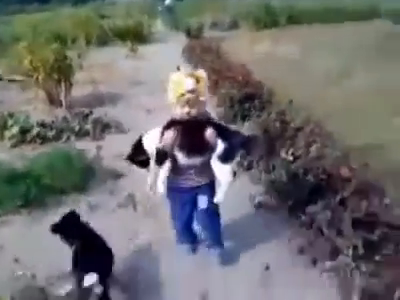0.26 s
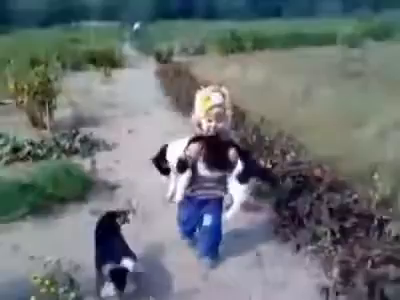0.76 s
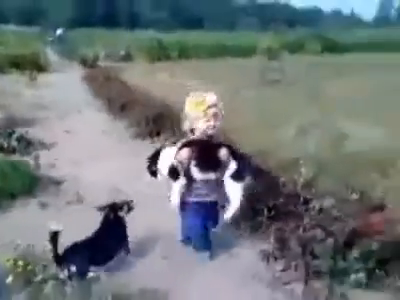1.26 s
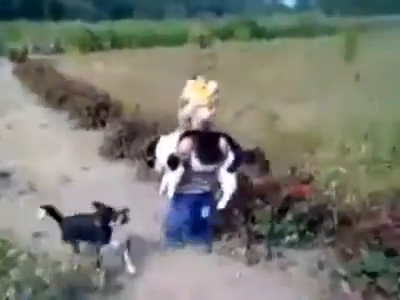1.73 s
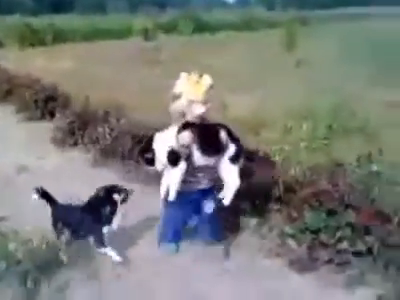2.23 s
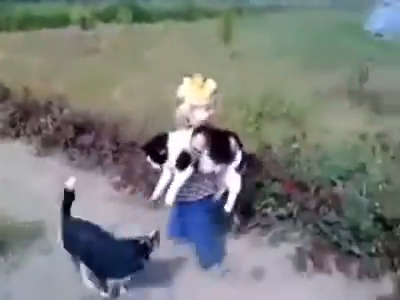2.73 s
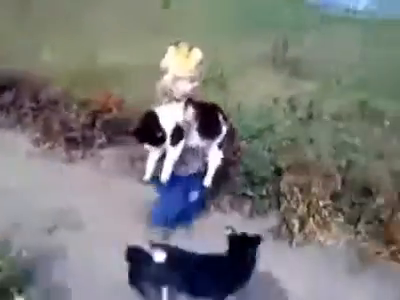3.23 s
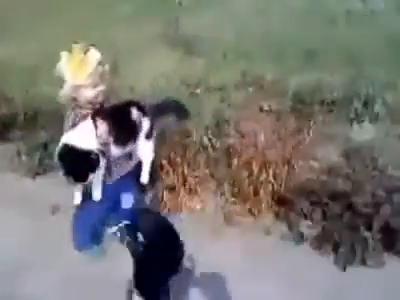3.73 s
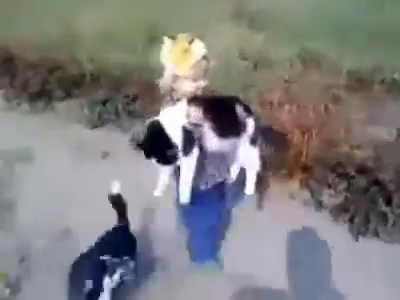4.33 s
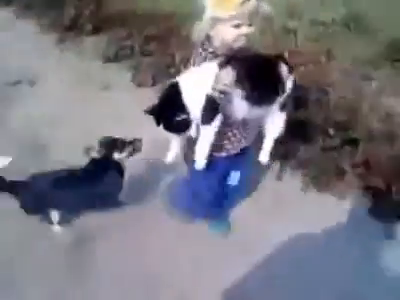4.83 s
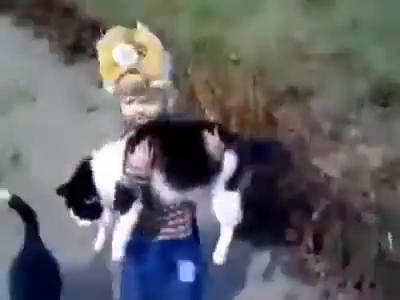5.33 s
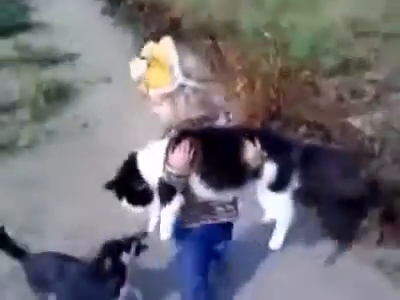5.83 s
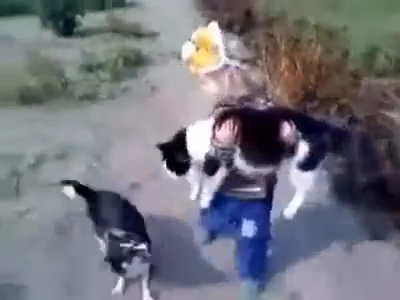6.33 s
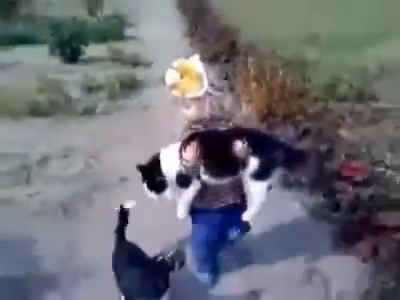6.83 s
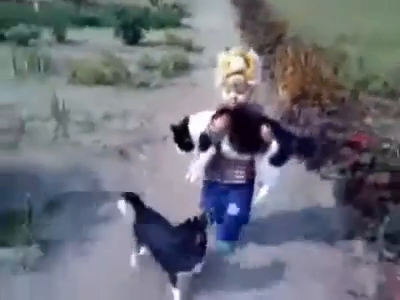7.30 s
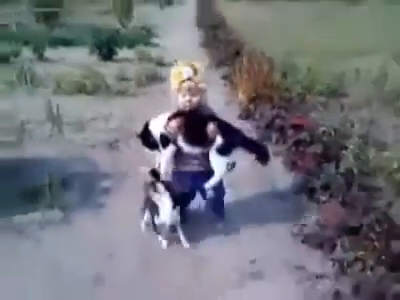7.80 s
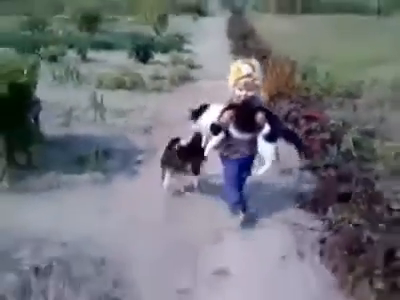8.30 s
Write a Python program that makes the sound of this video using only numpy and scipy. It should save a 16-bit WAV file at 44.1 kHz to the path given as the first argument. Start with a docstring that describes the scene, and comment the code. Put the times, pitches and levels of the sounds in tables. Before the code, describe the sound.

A small dog worries and snarls on a sandy garden path: a short growl, a brief gap, then long gravelly growls with moving jaw tones, clipped grunts and hard tooth-like snaps. A single bark bursts out after five seconds, then growling resumes and breaks into small snarls. Thudding gusts, soft sand scuffs and faint open-air hiss surround it, captured close by a modest handheld microphone.

```python
"""Sandy garden path: a small dog growls and snarls at a cat, with one sharp bark.
Its vocal folds flap unevenly into a throat whose resonances slide as the jaw and lips move.
Wind buffets the small microphone as lumpy low noise with single gusts; a faint wash lies under it.
Sharp snaps, of teeth or hard growl pulses and onsets, are noise cracks with a short hollow ring.
Swells of grainy noise make the foot scuffs on sand and brief bright ticks within the growls."""
import sys
import numpy as np
from scipy import signal
from scipy.fft import rfft, irfft, next_fast_len
from scipy.io import wavfile
from scipy.ndimage import uniform_filter1d

SR = 44100
rng = np.random.default_rng(int(sys.argv[2]) if len(sys.argv) > 2 else 0)


def inscribe(sig):
    """Save sig as 16-bit PCM at rate SR to the path in sys.argv[1].

    A 1-D sig is mono; a 2-D sig holds one channel per row.
    Samples are clipped to [-1, 1] before scaling.
    """
    pcm = np.round(np.clip(np.atleast_2d(sig).T, -1, 1) * 32767)
    wavfile.write(sys.argv[1], SR, pcm.astype(np.int16))


N = 377496
T = np.arange(N) / SR


def amp(db):
    """Decibels to gain."""
    return 10 ** (np.asarray(db) / 20)


def evened(x):
    """Scales to rms 1."""
    return x / np.sqrt(np.mean(x ** 2) + 1e-20)


def steadied(x, size=900):
    """Holds the rms near 1 over spans of about size samples, keeping the faster flutter."""
    power = uniform_filter1d(uniform_filter1d(x ** 2, size), size)
    return x / np.sqrt(abs(power) + 1e-12)


def add(mix, start_s, sound):
    """Mixes a sound in at start_s."""
    part = mix[max(round(start_s * SR), 0):][:len(sound)]
    part += sound[:len(part)]


def coloured(x, points):
    """Filters x by (Hz, dB) points, joined on a log-frequency axis, to rms 1."""
    size = next_fast_len(len(x) + 2048)
    hz, db = np.transpose(points)
    bin_hz = np.fft.rfftfreq(size, 1 / SR) + 1  # + 1 avoids log(0)
    gain = amp(np.interp(np.log(bin_hz), np.log(hz), db))
    return evened(irfft(rfft(x, size) * gain, size)[:len(x)])


def noise(count, points):
    """White noise coloured by (Hz, dB) points."""
    return coloured(rng.standard_normal(count), points)


def wander(count, hz):
    """Random curve: a new normal value hz times a second, joined by straight lines."""
    return np.interp(np.arange(count) * hz / SR, np.arange(4096), rng.standard_normal(4096))


def resonate(x, hz, width_hz):
    """Double-pole resonance that follows the curve hz: shift to 0 Hz, low-pass, shift back; rms 1."""
    turn = np.exp(2j * np.pi * np.cumsum(hz * np.ones(len(x))) / SR)
    r = np.exp(-np.pi * width_hz / SR)
    envelope = signal.lfilter([1], [1, -2 * r, r * r], x / turn)
    return evened((turn * envelope).real)


def bounced(x, ground_s=0.002723, hop=0.16, ground_db=-3.5):
    """The ground returns an echo whose delay shifts as the dog hops about."""
    at = np.arange(len(x))
    delay_s = ground_s * np.exp(hop * wander(len(x), 7))
    return x + amp(ground_db) * np.interp(at - delay_s * SR, at, x, left=0)


def voice(effort_db, snarl_db, bite_db, first_hz, second_hz, third_hz, pitch_hz, chest_db, rough, third_db):
    """Uneven slaps of the folds, each with a puff of breath, ring the moving resonances of the throat."""
    # Breath noise and weak upper resonances of the mouth. Each row: frequency in Hz, level in dB.
    rasp_colour = [(150, -35.5), (300, -15), (500, -18), (800, 2.5), (2800, -1), (3600, -6.5), (4400, -21),
                   (5500, -18), (6900, -26), (8000, -43)]
    # Dip between chest and jaw resonances. Each row: frequency in Hz, gain in dB.
    throat_dip = [(150, -5), (380, -7.5), (600, 0.5), (850, 1), (1300, -3)]
    usual_effort_db, pitch_rise_per_db = -33, 0.015
    jitter, slip_turns, shimmer_db, judder_db = .2, .18, 4, 3  # all scaled by rough
    quiver_depth, quiver_hz = .045, 80
    puff_turns, leak = .22, .14
    low_puffs, high_puffs = .35, .66  # share of turbulence in the drive
    count, rough = len(effort_db), min(rough, 1)

    # pitch climbs a little with effort and snarl
    pitch_hz = pitch_hz * np.exp(pitch_rise_per_db * (effort_db + snarl_db - usual_effort_db))
    turns = np.cumsum(pitch_hz * np.exp(jitter * rough * wander(count, 90))) / SR
    # loose tissue above the folds slaps early or late, in some cycles much harder than in others
    flaps = np.maximum.accumulate(turns + slip_turns * rough * wander(count, 110))
    rattle = amp(shimmer_db * rough * wander(count, 129.44))
    slaps = evened(np.diff(np.floor(flaps), prepend=-1))
    opening = leak + np.exp(-(flaps % 1) / puff_turns)

    def drive(puff_share):
        """The shared slaps, with fresh turbulence in every puff."""
        puffs = evened(opening * rng.standard_normal(SR)[:count])
        return rattle * ((1 - puff_share) * slaps + puff_share * puffs)

    def ring(x, hz, width_hz):
        """One resonance, which quivers in pitch and judders in strength on its own."""
        quiver = np.exp(quiver_depth * rough * wander(count, quiver_hz))
        judder = amp(judder_db * rough * wander(count, 90.04))
        return steadied(resonate(x, hz * quiver, width_hz)) * judder

    low, high = bounced(drive(low_puffs)), bounced(drive(high_puffs))
    jaw = amp(0.94) * ring(coloured(low, throat_dip), first_hz, 280)
    lips = amp(-0.6) * (ring(high, second_hz, 520) + amp(third_db) * ring(high, third_hz, 390))
    # bared teeth add a harsh edge from two resonances above the third
    teeth = ring(drive(1), third_hz + 680, 600) + amp(-5.5) * ring(drive(1), third_hz + 1900, 700)
    edge = amp(bite_db - 4.0) * teeth
    rasp = steadied(coloured(drive(1), rasp_colour)) * amp(-9.0 + .5 * snarl_db)
    # the two lowest partials and a weak low resonance leave through the chest and neck
    hum = np.sin(2 * np.pi * flaps) + amp(-13) * np.sin(4 * np.pi * flaps)
    chest = steadied(rattle * hum) + amp(-11.5) * ring(low, 427, 110)
    return amp(effort_db) * (jaw + amp(snarl_db) * lips + edge + rasp + amp(chest_db) * chest)


def growl(course, tone):
    """A long growl, or the bark: effort, lips and jaw move while the voice keeps its character."""
    s, *columns = np.transpose(course)
    t = np.arange(s[0], s[-1], 1 / SR)
    controls = [np.interp(t, s, column) for column in columns]
    fade = signal.windows.tukey(len(t), min(1, 300 / len(t)))
    return s[0], voice(*controls, *tone) * fade


def buffet(centre_s, db, length_s, hz):
    """One gust swells and dies; the smaller its eddies, the higher it reaches."""
    # Gust spectrum for hz = 150, shifted in proportion. Each row: frequency in Hz, level in dB.
    gust_colour = [(30, -41), (80, -4), (150, -1.5), (270, -3), (420, -14), (700, -28.5), (1500, -62.5)]
    start_s = max(centre_s - .25, 0)
    t = start_s + T[:SR // 2]
    eddies = steadied(noise(len(t), [(f * hz / 150, level_db) for f, level_db in gust_colour]))
    return start_s, amp(db) * np.exp(-(2 * (t - centre_s) / length_s) ** 2) * eddies


def wind(lump_db=4):
    """Lumpy low eddies at the microphone, with single gusts on top."""
    # Breeze strength. Each row: time in seconds, level in dB.
    breeze = [(0, -36), (.28, -40), (.42, -53.5), (.76, -55), (.87, -33), (1.4, -33.5), (2.45, -28),
              (2.7, -42), (3.1, -35.5), (3.5, -28.5), (3.92, -37), (5, -29.5), (5.42, -29.5), (5.7, -53),
              (6.45, -36.5), (7.2, -52), (8.35, -49.5), (8.56, -32.5)]
    # Breeze spectrum. Each row: frequency in Hz, level in dB.
    breeze_colour = [(12, -43), (20, -15.5), (49, 0), (123, -2.5), (262, -12.5), (435, -29), (468, -20),
                     (700, -34.5), (910, -63.5), (1540, -120)]
    # Gusts. Each row: centre in seconds, level in dB, length in seconds, strongest frequency in Hz.
    gusts = [(0.068, -26.5, 0.031, 64.6), (0.275, -32, 0.018, 99), (1.125, -21, 0.053, 100),
             (1.218, -22.5, 0.023, 99), (1.76, -30, 0.19, 111), (1.996, -21.5, 0.11, 83),
             (2.17, -18.5, 0.091, 142), (2.303, -16.5, 0.023, 156), (2.512, -19.5, 0.028, 91),
             (2.88, -27.5, 0.23, 90), (3.319, -21.5, 0.11, 133), (3.48, -19, 0.03, 99),
             (3.765, -26.5, 0.12, 98), (4, -26, 0.044, 103), (4.16, -32.5, 0.039, 90),
             (4.466, -26, 0.011, 140), (4.58, -20, 0.055, 99), (4.688, -25.5, 0.17, 87),
             (4.896, -23.5, 0.053, 88), (5.08, -16.5, 0.021, 140), (6.151, -31, 0.049, 145),
             (6.427, -30, 0.076, 88), (7.387, -30.5, 0.22, 77)]
    eddies = steadied(noise(N, breeze_colour), size=2200)
    level_db = np.interp(T, *np.transpose(breeze)) + lump_db * wander(N, 40)
    rumble = eddies * amp(level_db)
    for row in gusts:
        add(rumble, *buffet(*row))
    return rumble


def air(level_db=-48.5, flutter_db=2):
    """Leaves and distant wind: a faint restless wash."""
    # Wash spectrum. Each row: frequency in Hz, level in dB.
    air_colour = [(60, -9.5), (150, -19), (320, -20.5), (1000, -21), (1450, -20), (2000, -21),
                  (2600, -18.5), (3400, -30), (6800, -33.5), (8000, -72.5)]
    return amp(level_db) * noise(N, air_colour) * amp(flutter_db * wander(N, 30))


def snarl(start_s, length_s, effort_db, snarl_db, first_hz, second_hz):
    """A short push of breath: quick attack, sagging hold as the jaw closes, dying release."""
    rise_s, fall_s = 0.011, 0.017
    sag_db, closing = 3, 0.11  # total change from start to end of the hold
    pitch_hz, chest_db, rough, third_db = 139.3, -5.5, .8, -4  # third_db relative to the second resonance
    bite_db = snarl_db - 16.5
    third_hz = second_hz + 637
    t = np.arange(0, length_s + 5 * fall_s, 1 / SR)
    early = .5 - np.minimum(t / length_s, 1)
    gate = np.minimum(t / rise_s, 1) * np.exp(-np.maximum(t - length_s, 0) / fall_s)
    mouth = 1 + closing * early
    sound = voice(effort_db + sag_db * early, snarl_db, bite_db,
                  first_hz * mouth, second_hz * mouth ** .5, third_hz * mouth ** .5,
                  pitch_hz, chest_db, rough, third_db)
    return start_s, gate * sound


def snap(start_s, db, ring_hz, tail_db, crack_s=0.0016, tail_s=0.035):
    """A sharp snap: a dry noise crack with a short hollow ring and a scattered tail."""
    # Crack spectrum. Each row: frequency in Hz, level in dB.
    crack_colour = [(300, -11), (1100, -6.5), (1500, -9.5), (1800, -3.5), (2700, -2), (5500, -20),
                    (8000, -35)]
    t = T[:SR // 5]
    decay = np.exp(-t / crack_s) + amp(tail_db) * np.exp(-t / tail_s)
    burst = rng.standard_normal(len(t)) * decay
    sound = coloured(burst, crack_colour) + amp(-3.5) * resonate(burst, ring_hz, 350)
    return start_s, amp(db) * sound / np.std(sound[:220])  # level set over the first 5 ms


def swells(rows):
    """Level curve of smooth humps, summed in power; rows of (centre s, level dB, length s)."""
    power = 0
    for centre_s, db, length_s in rows:
        fall = 2 * (2 * (T - centre_s) / length_s) ** 2
        power = power + amp(db) ** 2 * np.exp(-np.minimum(fall, 60))
    return np.sqrt(power)


def scuffs_and_ticks(grain_db=4):
    """Swells of grainy noise: sand grinding under a foot, or brief bright ticks within the growls."""
    # Foot scuffs, and brief bright ticks within the growls.
    # Each row: centre in seconds, level in dB, length in seconds.
    grain_swells = [(1.87, -37, 0.084), (2.418, -30, 0.0085), (3.189, -31.5, 0.0085), (3.31, -32, 0.1),
                    (4.14, -47.5, 0.35), (5.28, -34, 0.08), (5.65, -30, 0.0079), (5.74, -40.5, 0.054),
                    (5.84, -46, 0.043), (6.98, -42.5, 0.19), (8.34, -40.5, 0.039)]
    # Grain spectrum. Each row: frequency in Hz, level in dB.
    grain_colour = [(300, -11), (800, -1.5), (1600, 1), (2600, 5), (3700, -1.5), (5000, -7), (6800, -9.5),
                    (8000, -47)]
    grains = rng.standard_normal(N) * amp(grain_db * wander(N, 400))
    return swells(grain_swells) * coloured(grains, grain_colour)


def garden(x, t60_s=0.24, wet_db=-16):
    """Bushes and legs scatter a weak tail: decaying noise taps after 4 ms."""
    t = T[:SR // 2]
    taps = rng.standard_normal(len(t)) * (t > .004) * amp(-60 * t / t60_s)
    return amp(wet_db) * signal.fftconvolve(x, taps / np.linalg.norm(taps))[:N]


def scene():
    """Close sounds and their scattered tail join wind and air at one microphone, alike in both channels."""
    # Courses of the long growls; the eighth is the bark. Each row: time in seconds, effort in dB,
    # snarl (second and third resonance over the first, before fixed trims) in dB,
    # bite (harsh edge over the first resonance, before fixed trims) in dB,
    # first, second and third resonance in Hz.
    courses = [
        [(0.0, -26, -9.5, -16, 1090, 2090, 2310), (0.065, -35.5, -4, -15, 750, 2000, 2260),
         (0.115, -28, -2, -11, 1060, 2250, 3000), (0.17, -26.5, -0.5, -16, 1320, 2250, 3100),
         (0.198, -25.5, -7, -21, 1160, 2150, 3150), (0.215, -33.5, 1.5, -12, 1170, 2200, 3020),
         (0.275, -52, 4, -8, 1310, 2550, 3350)],
        [(0.935, -46.5, 5, 2, 900, 1950, 2420), (0.97, -34.5, -2, -15, 700, 1950, 2300),
         (1.02, -24.5, -7.5, -18, 1110, 2150, 2700), (1.07, -29, -3.5, -25, 1200, 2500, 2760),
         (1.16, -29, -6.5, -25, 1195, 2560, 2840), (1.225, -44.5, 2.5, -9, 880, 1930, 2700),
         (1.255, -36, -2.5, -18, 990, 2090, 2850), (1.278, -25.5, -8, -32.5, 1080, 2160, 3000),
         (1.35, -28.5, -9.5, -32, 1126, 2080, 2550), (1.45, -33.5, -1.5, -12, 1080, 2150, 2530),
         (1.56, -28.5, -7.5, -22, 1176, 2150, 2500), (1.655, -29, -10.5, -35.5, 1320, 2160, 2580),
         (1.7, -23, -11, -32.5, 1210, 2400, 2700), (1.72, -41.5, 1.5, -16, 1090, 2420, 2640),
         (1.752, -51.5, 7, -12.5, 1060, 2400, 2640)],
        [(2.2, -53.5, -5, -9, 700, 1850, 2700), (2.25, -29.5, -4, -28, 970, 1960, 2780),
         (2.32, -35, -6.5, -19.5, 1256, 1940, 2950), (2.4, -30, 2.5, -23, 1100, 1970, 2700),
         (2.445, -40.5, 3.5, -13, 880, 1980, 2670), (2.5, -30.5, -5.5, -21.5, 1220, 1990, 3050),
         (2.535, -25, -12.5, -28, 1230, 2000, 2900), (2.56, -30, -5, -22, 1220, 2000, 3100),
         (2.57, -25.5, -4.5, -31, 1220, 1950, 3100), (2.63, -22.5, -3, -28, 1060, 1970, 2800),
         (2.665, -48, 5.5, 0, 860, 2040, 2600), (2.71, -46.5, 7, -3, 910, 2450, 3260),
         (2.76, -65, 9.5, -8, 950, 2350, 3350)],
        [(2.783, -36.5, 1, -13, 1650, 2300, 2900), (2.81, -29.5, -4, -11, 1510, 2200, 3000),
         (2.832, -35, 4, -4.5, 1000, 1980, 3020), (2.86, -43.5, 4, 2, 750, 1770, 2930),
         (2.895, -51, -3, -4, 750, 1560, 2720)],
        [(3.18, -58.5, 4, 11, 1300, 2200, 2700), (3.2, -32.5, 0, -13, 1320, 1880, 2650),
         (3.23, -21, -7.5, -12, 880, 1920, 2970), (3.26, -32, -8, -13, 696, 1950, 2880),
         (3.32, -35.5, 0.5, -8, 1060, 2030, 2940), (3.41, -36.5, 4, -21, 1040, 1730, 2800),
         (3.46, -31.5, -2.5, -29, 960, 1840, 2760), (3.57, -34.5, -1, -26, 970, 1950, 3090),
         (3.62, -45, -3.5, -13, 800, 1900, 2800), (3.69, -59.5, 15.5, 1.5, 760, 1760, 2800)],
        [(3.942, -53, 3, -16, 1450, 1750, 2400), (3.965, -42, -0.5, -20, 1300, 1770, 2200),
         (3.97, -30, -0.5, -33, 1160, 1800, 1990), (4.0, -34, -3, -27, 1040, 1900, 2290),
         (4.033, -28.5, -7, -12, 930, 2100, 2750), (4.055, -38.5, 3, -15, 834, 2140, 2800),
         (4.18, -36, 2.5, -7, 880, 2060, 2840), (4.24, -59, 1.5, -10, 810, 2000, 2700)],
        [(4.715, -55.5, 10.5, -8, 850, 2500, 2920), (4.742, -27.5, -0.5, -14, 710, 2280, 2930),
         (4.772, -22, -0.5, -8, 1290, 2110, 2850), (4.808, -26.5, -0.5, -17, 1230, 1900, 2590),
         (4.85, -35.5, 4, -15, 1180, 2520, 3000), (4.875, -43.5, 1.5, -7, 620, 2270, 2550),
         (4.915, -33.5, -4, -21, 820, 2000, 2710), (4.938, -26, -6, -20, 1170, 1550, 2820),
         (4.975, -28, -4.5, -22, 1230, 1600, 2840), (4.992, -30.5, -6, -17, 1020, 1690, 2740),
         (5.04, -31.5, -2, -15, 930, 1750, 2580), (5.11, -37, -3.5, -13, 950, 1980, 2770),
         (5.165, -54, 6, 4.5, 1040, 2210, 3000)],
        [(5.605, -54.5, 6.5, 5, 1450, 2400, 3200), (5.636, -48.5, 10, 7, 1450, 2400, 3200),
         (5.645, -36, 11, 11, 1450, 2480, 3240), (5.66, -23.5, 0.5, -9, 1240, 2130, 3050),
         (5.674, -20, -4.5, -18, 970, 1950, 2750), (5.71, -20.5, -1.5, -27, 930, 1950, 2970),
         (5.724, -28.5, -9, -10, 1320, 2090, 3350), (5.75, -38.5, 0.5, -6, 1370, 2200, 3450),
         (5.79, -53, 8, 0, 1350, 2100, 3500)],
        [(6.268, -53, 1, -7, 850, 2300, 2900), (6.288, -28.5, -7, -22, 870, 1900, 2370),
         (6.35, -42, 5.5, -19, 1010, 2280, 3100), (6.42, -33.5, -4.5, -32, 1260, 2050, 2600),
         (6.48, -39.5, 3, -10.5, 970, 2180, 2540), (6.56, -33.5, 1.5, -20, 1300, 1860, 2430),
         (6.63, -38.0, 7, -4, 860, 2360, 2690), (6.668, -26, -10.5, -18.5, 880, 2050, 2580),
         (6.71, -32.5, 5.5, -22.5, 1320, 2150, 2980), (6.77, -27.5, -4.5, -21, 1350, 2080, 2860),
         (6.86, -52.5, 1, -15, 1320, 2150, 2900)],
        [(7.232, -53.5, 12.5, -5, 950, 1700, 2580), (7.26, -32.5, 2, -40, 910, 1670, 2750),
         (7.305, -37.5, 8, -12, 900, 1720, 3300), (7.39, -40, -1.5, -27, 810, 1790, 2900),
         (7.55, -35.5, -6, -32, 930, 1850, 2830), (7.69, -30, -2, -18, 960, 1880, 2870),
         (7.755, -33, 6.5, -8, 880, 1920, 3140), (7.79, -34.5, 7.5, -10, 1120, 2660, 3240),
         (7.86, -40, 1.5, -13, 1510, 2750, 3500), (7.89, -57, 3, -11, 1550, 2700, 3500)],
    ]
    # Voice of each course, same order. Each row: pitch at usual effort in Hz, chest hum relative to
    # effort in dB, roughness 0-1, third resonance over the second in dB.
    tones = [(160.3, -5.5, .55, -4), (140.2, -17.5, .85, -5.5), (110.5, -25, 0.5, -2), (86, -13, 0.87, -6),
             (126.1, -3.5, .85, -4), (126.8, -0.5, 1, -4), (111.2, -18, 0.96, -3.5), (111.2, -29, .45, -5),
             (168.3, -5, 0.6, -3.5), (163.2, -2.5, .6, -2)]
    # Short snarls and grunts. Each row: start in seconds, length before release in seconds,
    # mid-hold effort in dB, snarl in dB, mid-hold first and second resonance in Hz.
    short_snarls = [(0.317, 0.056, -36, -1.5, 1200, 2300), (1.81, 0.098, -34.5, 2, 1205, 1840),
                    (1.919, 0.16, -42.5, 0, 1070, 1830), (2.789, 0.024, -35.5, 1.5, 1500, 2020),
                    (2.865, 0.024, -44.5, 2.5, 760, 1450), (2.925, 0.042, -40, 5.5, 1100, 1910),
                    (4.273, 0.048, -37, 4, 806, 1700), (4.377, 0.062, -44.5, 3.5, 880, 1580),
                    (5.224, 0.088, -34.5, 1.5, 1250, 1750), (5.332, 0.038, -26, 0, 1200, 1790),
                    (5.494, 0.05, -33, -1, 1210, 1990), (5.798, 0.012, -37.5, -1.5, 1570, 3550),
                    (5.83, 0.033, -44.5, -0.5, 1820, 3440), (5.941, 0.12, -51.5, 2.5, 980, 1650),
                    (6.878, 0.041, -34.5, 0.5, 870, 1340), (6.938, 0.071, -42.5, 5.5, 1107, 1670),
                    (7.901, 0.056, -43.5, 6.5, 890, 1500), (7.99, 0.074, -40, 1.5, 860, 1540),
                    (8.116, 0.036, -50, 9.5, 980, 1710), (8.286, 0.057, -36.5, 7.5, 1030, 1780),
                    (8.39, 0.051, -33, -5, 866, 1810), (8.411, 0.0075, -40, 11, 900, 2570),
                    (8.461, 0.029, -25, -2.5, 920, 1600)]
    # Sharp snaps: teeth, or hard single pulses and onsets of a growl.
    # Each row: start in seconds, level in dB, ring in Hz, tail relative to crack in dB.
    sharp_snaps = [(0.446, -31.5, 1500, 8), (0.723, -28, 1500, -6), (1.757, -26, 1140, -18.5),
                   (1.908, -24.5, 2700, -15), (2.789, -35.5, 1660, -3.5), (5.247, -18.5, 2880, -25),
                   (5.357, -22.5, 1280, -15), (5.821, -33, 2260, -26), (6.897, -27.5, 3280, -9.5)]
    close = scuffs_and_ticks()
    for course, tone in zip(courses, tones):
        add(close, *growl(course, tone))
    for row in short_snarls:
        add(close, *snarl(*row))
    for row in sharp_snaps:
        add(close, *snap(*row))
    mix = close + garden(close) + wind() + air()
    return np.array([mix, mix])


def record(dry):
    """A narrow-band recorder, low-passed at 7500 Hz, whose left channel lags by one sample."""
    lagged = np.array([np.append(0, dry[0, :-1]), dry[1]])
    low_pass = signal.firwin(255, 7500, window=("kaiser", 8), fs=SR)
    return signal.oaconvolve(lagged, low_pass[None], "same")


dry = scene()
out = record(dry)
inscribe(out)
```